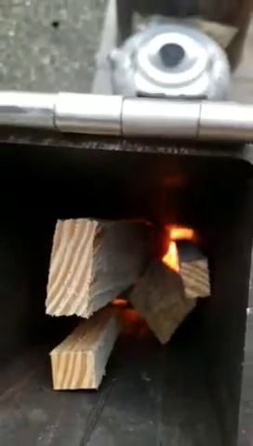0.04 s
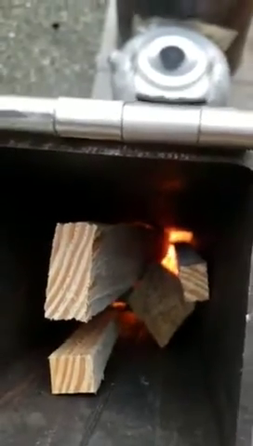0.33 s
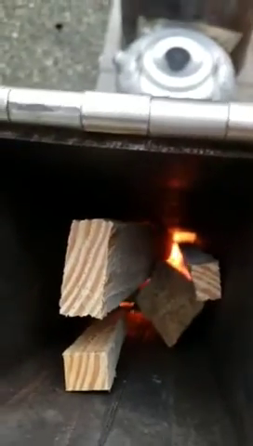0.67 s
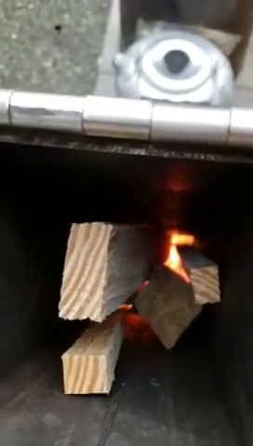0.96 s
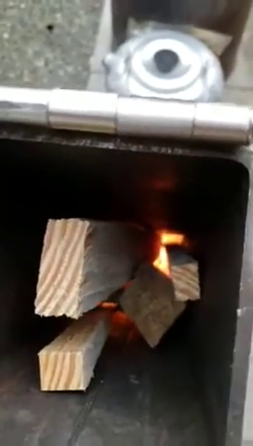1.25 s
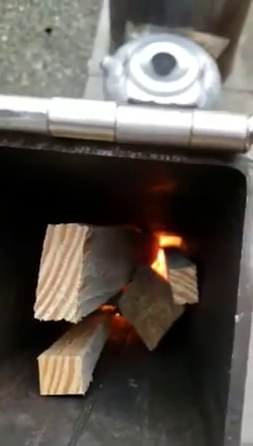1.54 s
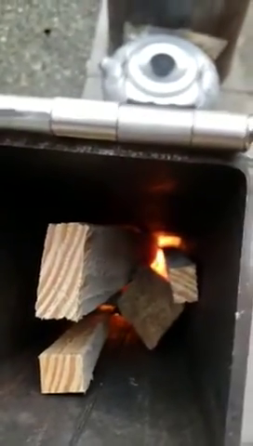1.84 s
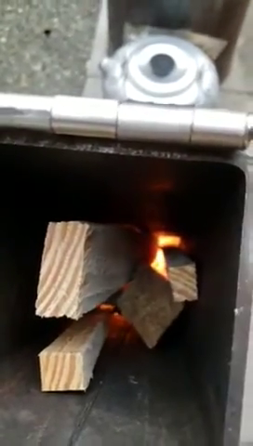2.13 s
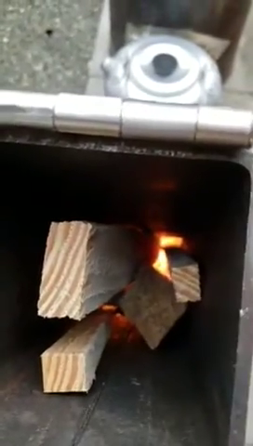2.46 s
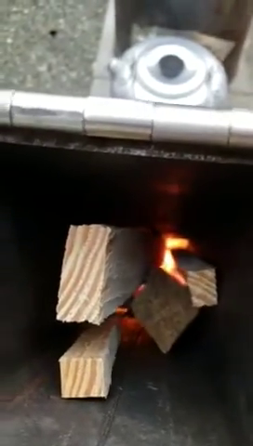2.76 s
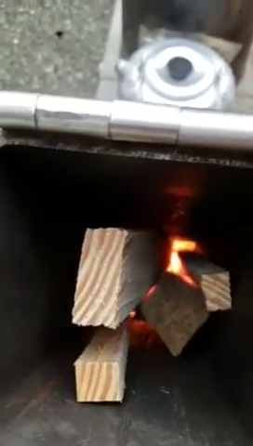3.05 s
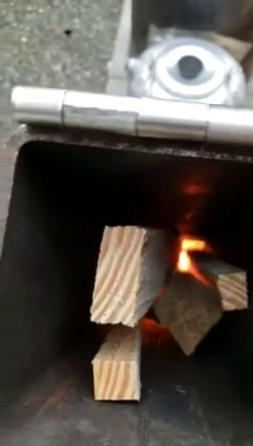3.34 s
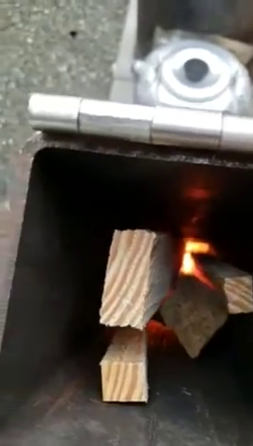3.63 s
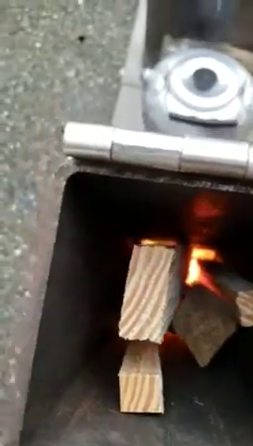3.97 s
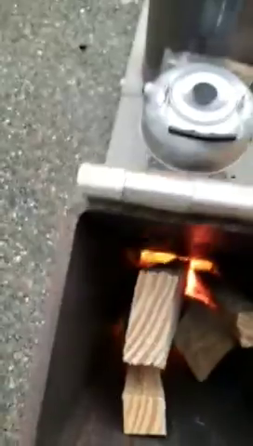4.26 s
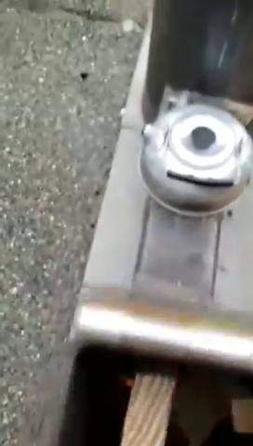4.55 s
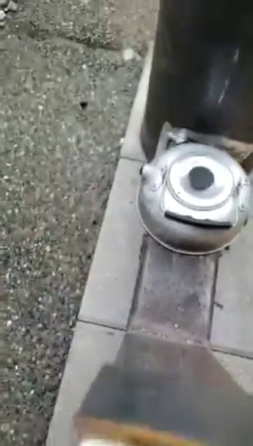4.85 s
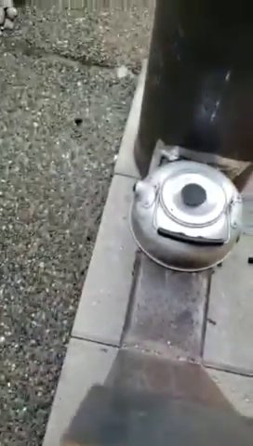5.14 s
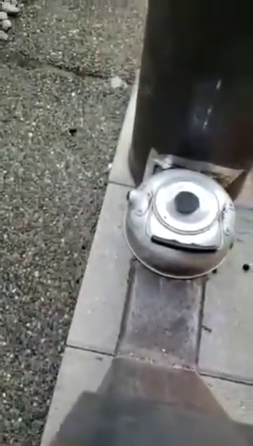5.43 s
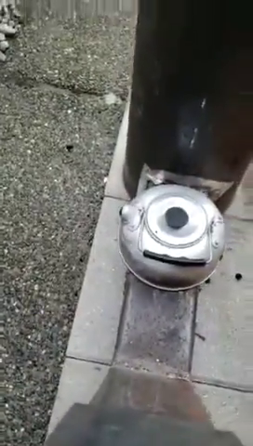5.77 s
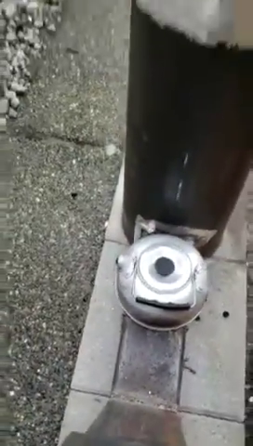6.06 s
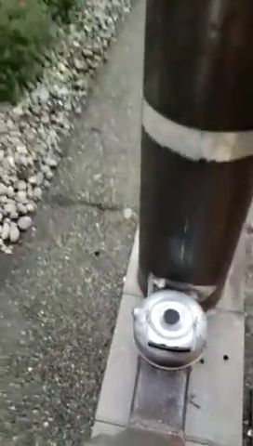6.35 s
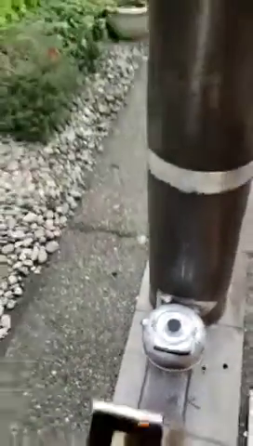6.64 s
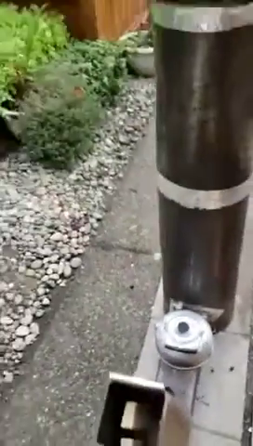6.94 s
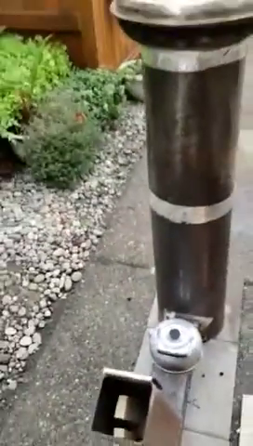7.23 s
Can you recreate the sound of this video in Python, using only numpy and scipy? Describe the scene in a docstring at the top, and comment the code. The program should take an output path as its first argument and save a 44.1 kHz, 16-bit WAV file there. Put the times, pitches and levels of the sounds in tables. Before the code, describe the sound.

Close over the opening of a steel wood stove, flames rumble and flutter with a deep, resonant pipe tone. Small crackles, soft puffs and a thin sizzle come from the wood throughout. A sharp snap comes about midway and a louder one later, as the sound shifts slightly right. The fire then grows quieter as the microphone draws back, with a faint, dull outdoor background underneath.

```python
"""Fire in a steel stove

A fire draws hard in a home-made stove outdoors. Fluttering flames drive the air modes of the feed
tube and flue pipe into a rumble; the sticks hiss, sizzle, spit gas and crack. The microphone pair
hangs over the feed opening, then passes beside the pipe and backs away."""
import sys
import numpy as np
from scipy import signal
from scipy.fft import rfft, irfft
from scipy.io import wavfile
from scipy.ndimage import uniform_filter1d, map_coordinates

SR = 44100
rng = np.random.default_rng(int(sys.argv[2]) if len(sys.argv) > 2 else 0)


def to_wav(sig):
    """Store sig (one row per channel, or 1-D mono) as 16-bit WAV at the path in sys.argv[1].

    Samples outside -1..1 are clipped; the rate is SR.
    """
    pcm = np.clip(np.atleast_2d(sig), -1, 1) * 32767
    pcm = np.round(pcm).astype(np.int16)
    wavfile.write(sys.argv[1], SR, pcm.T)  # frames by channels


N = 321914
TIME = np.arange(N) / SR
FREQ = np.fft.rfftfreq(N, 1 / SR)


def amp(db):
    """Decibels to gain."""
    return 10 ** (np.asarray(db) / 20)


def unit(x):
    """Scales to unit rms."""
    return x / np.sqrt(np.mean(x ** 2) + 1e-20)


def unit_onset(x, span_s=0.002):
    """Scales to unit rms over the onset."""
    return x / np.sqrt(np.mean(x[:, :round(span_s * SR)] ** 2))


def running_rms(x, span_s):
    """Sliding rms; dividing by it leaves only the faster flutter."""
    return np.sqrt(abs(uniform_filter1d(np.mean(x ** 2, axis=0), int(span_s * SR))) + 1e-20)


def curve(points):
    """Breakpoints interpolated over time."""
    return np.interp(TIME, *np.transpose(points))


def spectrum(points):
    """Breakpoints interpolated over log frequency."""
    hz, value = np.transpose(points)
    return np.interp(np.log(FREQ + 1), np.log(hz + 1), value)


def colour(x, gain):
    """Filters by one gain per frequency."""
    return irfft(rfft(x) * gain, N)


def highpass(hz, order):
    """Gain per frequency of a high-pass."""
    return 1 / (1 + (hz / (FREQ + 1)) ** order)


def resonances(modes):
    """Gain per frequency of steep-skirted modes, summed in power."""
    gains = (amp(db) / (1 + ((FREQ - hz) / (0.59 * width_hz)) ** 2) for hz, width_hz, db in modes)
    return np.sqrt(sum(gain ** 2 for gain in gains))


def wander(hz):
    """Smooth unit-rms noise up to a given rate."""
    return unit(colour(rng.standard_normal(N), 1 / (1 + (FREQ / hz) ** 4)))


def stereo_noise(correlation):
    """White noise; left-right correlation overall or per frequency."""
    a, b = rng.standard_normal((2, N))
    mid = colour(a, np.sqrt((1 + correlation) / 2))
    side = colour(b, np.sqrt((1 - correlation) / 2))
    return np.array([mid + side, mid - side])


def short_noise(correlation, size):
    """A short stretch of stereo white noise."""
    noise = rng.standard_normal((3, size))
    return np.sqrt(correlation) * noise[0] + np.sqrt(1 - correlation) * noise[1:]


def impulses(per_s, spread_db):
    """Random impulses of uneven strength."""
    return (rng.random(N) < per_s / SR) * amp(spread_db * np.minimum(rng.exponential(1, N), 2))


def pan(db):
    """Constant-power gains for a left-minus-right level."""
    gains = amp(np.array([np.atleast_1d(db), -np.atleast_1d(db)]) / 2)
    return gains / np.sqrt(np.mean(gains ** 2, axis=0))


def add(mix, start_s, sound):
    """Mixes a sound in at a time."""
    part = mix[:, round(start_s * SR):][:, :sound.shape[1]]
    part += sound[:, :part.shape[1]]


# freq_hz, density_db
GARDEN_SPECTRUM = [(20, -23), (70, -32), (170, 0.5), (270, 1.5), (550, 0.5), (680, -3), (780, -11),
                   (950, -4.5), (1200, -25.5), (1900, -20.5), (2600, -55), (5000, -29)]

def garden(level_db=-57):
    """Steady, dull outdoor background."""
    return amp(level_db) * unit(colour(stereo_noise(0.5), amp(spectrum(GARDEN_SPECTRUM))))


# Stove position: time_s, aside (0 straight below, 1 off to the right)
STOVE_ASIDE = [(0, 0.0015), (4.0, 0), (4.7, 1), (5.4, 1), (6.2, 0.56), (7.3, 0.68)]

def side_shade(x, shade_db=-4):
    """With the stove off to the right, the left channel is weaker."""
    return x * pan(shade_db * curve(STOVE_ASIDE))


def side_delay(x):
    """With the stove off to the right, sound reaches the left microphone later."""
    lag_s = np.interp(TIME, [0, 3.9, 4.7, 7.3], [-.00003, 0, .00027, .00032])
    return np.array([map_coordinates(x[0], [(TIME - lag_s) * SR], order=5), x[1]])


# freq_hz, pan_db
BEAM_PAN = [(100, -8), (1500, -4), (4000, 4.5), (8000, 3), (12000, 11), (15000, 18)]

def opening_beam(x):
    """Treble beams unevenly from the opening, favouring the left microphone above it."""
    aside = curve(STOVE_ASIDE)
    return (1 - aside) * colour(x, pan(spectrum(BEAM_PAN))) + aside * x


# pitch_hz, width_hz, gain_db
TUBE_MODES = [(3460, 71, -20), (3830, 36, -3), (4240, 77, -2), (4600, 44, -4), (4990, 74, -3.5),
              (6440, 400, -7.5), (7900, 980, -6), (12070, 500, -7.5), (15000, 500, -5)]

def feed_tube(x):
    """Sound from the sticks rings the steel tube on its way out; a bright peak also sits near 15 kHz."""
    return x + sum(amp(db) * signal.lfilter(*signal.iirpeak(hz, hz / width_hz, fs=SR), x)
                   for hz, width_hz, db in TUBE_MODES)


# pitch_hz, width_hz, gain_db
WALL_MODES = [(50.4, 11, -20), (86, 4.5, 2), (106.5, 100, -2)]
# Loss as the microphone backs away: time_s, gain_db
DISTANCE_GAIN = [(0, 0.5), (4.4, -1), (5.55, -4), (5.95, -4.5), (6.1, -9.5), (6.45, -6.5), (6.7, -16.5),
                 (7.3, -20.5)]

def wall_rumble(level_db=-49, distance_share=0.14):
    """The draught shakes the pipe wall at its deepest modes, which fade little with distance."""
    wall = unit(colour(stereo_noise(0.98), resonances(WALL_MODES) * highpass(28, order=4)))
    return amp(level_db + distance_share * curve(DISTANCE_GAIN)) * wall


# start_s, level_db, pitch_hz, pan_db
EMBER_TICKS = [(.3495, -57, 6700, -4), (.5955, -57, 11800, 5), (.7665, -58, 14000, 3),
               (.7875, -55, 14000, 7), (.9995, -58, 12600, 3), (1.0435, -55, 14500, 4),
               (1.3435, -57, 11600, 5), (2.0105, -59, 6100, -4), (2.2075, -60, 8000, -1),
               (2.4015, -62, 7500, 3), (2.4225, -58, 14000, 4), (2.4425, -58, 12200, 5),
               (3.0992, -54, 7460, 5), (3.2125, -62, 14500, 3), (3.2923, -54, 4900, -5),
               (4.2265, -55, 13400, 9), (4.8115, -51, 8400, -10), (5.0365, -57, 7600, -6),
               (5.0485, -55, 7700, -5), (5.2075, -56, 4400, -13), (5.2295, -56, 7500, -9),
               (5.7025, -57, 12800, -11), (6.7045, -58, 14000, -5)]

def embers(gain_db=2, t60_s=0.0093, width_octaves=0.42, size=1024):
    """Flakes of char flick off the embers: dry ticks, each around its own pitch."""
    out, t, hz = np.zeros((2, N)), np.arange(size) / SR, np.fft.rfftfreq(size, 1 / SR)
    for start_s, level_db, pitch_hz, pan_db in EMBER_TICKS:
        band = 1 / (1 + (np.log2((hz + 1) / pitch_hz) / width_octaves) ** 2)
        tick = irfft(rfft(short_noise(0.18, size)) * band, size) * amp(-60 * t / t60_s)
        add(out, start_s, amp(level_db + gain_db) * pan(pan_db) * unit_onset(tick))
    return out


# time_s, level_db
HISS_LEVEL = [(0, -59), (1.5, -60.5), (1.75, -61.5), (2.4, -59.5), (3.8, -61.5), (4.25, -59.5), (4.65, -56),
              (6.1, -57.5), (6.55, -60.5), (6.81, -64), (7.3, -67.5)]
# Over the opening and beside the pipe: freq_hz, density_db
HISS_SPECTRUM_OVER = [(1500, 3), (1950, 3), (2400, 2.5), (3100, 2), (4200, 1), (5400, -1.5), (6400, -1.5),
                      (8000, -4.5), (9400, -3.5), (12000, -3.5), (14000, -1), (15300, -2)]
HISS_SPECTRUM_BESIDE = [(1500, 7), (1950, 4), (2300, 1.5), (2720, -5), (3500, 1), (4150, -1), (4800, -2.5),
                        (7900, -5.5), (9200, -7), (12500, -6.5), (14000, -8.5), (15300, -4)]
# Splitting wood, for ticks and cracks: low_hz, high_hz, decay_factor, echo_db
SPLIT_BANDS = [(1893, 2290, 0.66, -25), (3450, 4600, 0.84, 9.5), (4900, 7900, 0.93, 11.5),
               (10340, 20000, 0.57, 0.5)]

def hiss(gain_db=2.5, flicker_db=1.45, flicker_hz=35, tick_db=-8, tick_decay_s=0.0058):
    """Gas seeps from the wood in a flickering hiss, with tiny ticks of splitting char."""
    gas = stereo_noise(0.05) * amp(flicker_db * wander(flicker_hz))
    for low_hz, high_hz, *_ in SPLIT_BANDS[1:]:  # coarse, medium and fine char
        splits = impulses(per_s=70, spread_db=4)
        envelope = signal.lfilter([1], [1, -np.exp(-1 / (tick_decay_s * SR))], splits)
        ticks = unit(stereo_noise(0.05) * envelope)
        gas += amp(tick_db) * colour(ticks, (FREQ > low_hz) & (FREQ < high_hz))
    over = unit(colour(gas, amp(spectrum(HISS_SPECTRUM_OVER))))
    beside = unit(colour(gas, amp(spectrum(HISS_SPECTRUM_BESIDE))))
    aside = curve(STOVE_ASIDE)
    pan_db = -4 - 3 * aside
    return ((1 - aside) * over + aside * beside) * amp(curve(HISS_LEVEL) + gain_db) * pan(pan_db)


# time_s, gain_db
TREBLE_GAIN = [(0, -1.5), (.6, -1), (5.3, 1.5), (5.95, 3.5), (6.25, 4.5), (6.6, 1.5), (7.3, 0)]

def treble_swell(x, from_hz=11000):
    """The top treble slowly rises, then falls back."""
    return x + (amp(curve(TREBLE_GAIN)) - 1) * colour(x, highpass(from_hz, order=12))


def sizzle(per_s=60, gain_db=-12, t60_s=0.012, pitches=16, pan_spread_db=4):
    """Sap droplets burst on hot wood in tiny pitched ticks; the level follows the hiss."""
    out, t = np.zeros((2, N)), np.arange(512) / SR
    for hz in np.linspace(3200, 9000, pitches):
        bursts = impulses(per_s / pitches, spread_db=3)
        phase_cycles = 0.67 * rng.random((2, 1))
        tick = amp(-60 * t / t60_s) * np.sin(2 * np.pi * (hz * t + phase_cycles))
        ticks = signal.oaconvolve(bursts[None], tick, axes=1)[:, :N]
        out += pan(pan_spread_db * rng.standard_normal()) * ticks
    return amp(gain_db + curve(HISS_LEVEL)) * unit(out)


# peak_s, level_db, half_length_s, tilt_db_per_octave, pan_db
HISSING_SWELLS = [(0.313, -54, 0.01, 6, -4), (.78, -64, 0.013, 5, -2), (1.374, -56, 0.026, -0.5, -5),
                  (1.49, -55, 0.0079, 1, -8), (2.716, -59, 0.012, -3, -3), (3.10, -58, 0.0073, 1, -8),
                  (3.58, -49, 0.0082, 11, -5), (4.145, -62, 0.013, 1, 0), (6.047, -61, 0.0051, -6, -10),
                  (6.49, -51, 0.024, 0, -4.5)]
# freq_hz, density_db
SWELL_SPECTRUM = [(1200, -9), (2300, 13), (3100, 12.5), (4200, 8.5), (7500, 8.5), (10000, 6), (12500, 5),
                  (15000, -5)]

def hissing_swells(flicker_db=1, flicker_hz=300, tilt_from_hz=2000):
    """Short hissing swells: spits of gas and the ragged tail of a loud crack."""
    out = np.zeros((2, N))
    noise = stereo_noise(0.13) * amp(flicker_db * wander(flicker_hz))
    octaves = np.log2(np.maximum(FREQ, tilt_from_hz) / tilt_from_hz)
    for peak_s, level_db, half_s, tilt, pan_db in HISSING_SWELLS:
        swell = np.exp(-np.abs((TIME - peak_s) / half_s) ** 1.37 / 2)
        rush = unit(colour(noise, amp(spectrum(SWELL_SPECTRUM) + tilt * octaves)))
        out += amp(level_db) * swell * pan(pan_db) * rush
    return out


# pitch_ratio, gain_db, t60_s
STICK_MODES = [(1, 2, 0.17), (1.58, -3, 0.057), (2.01, -7, 0.019)]
# start_s, knock_db, knock_hz, low_db, middle_db, high_db, pan_db, ring_hz, ring_gain_db, echo_gain_db
WOOD_CRACKS = [(0.0656, -78, 1290, -59, -57, -44, 3, 4600, -1, -24),
               (0.129, -75, 1290, -59, -59, -40, 8, 6900, 7, -17),
               (0.2955, -70, 1270, -54, -54, -37.5, -9, 5100, -6, -9),
               (0.677, -72, 1290, -51, -48, -40, -4, 6400, 3, -18),
               (1.4, -63, 1290, -50, -43.5, -37, -7, 2770, 3, -25),
               (1.4945, -62, 1330, -44, -41, -58, -7, 3900, -5, -23),
               (1.6, -75, 1290, -59, -57, -46, -4, 4350, -3, -11),
               (1.887, -80, 1290, -74, -63, -49, 12, 7200, 12, -9),
               (2.7092, -53, 1650, -60, -51.5, -56, -4, 4270, 13, -14),
               (2.9198, -73, 1290, -66, -49, -41, 0, 7100, 8, -24),
               (3.253, -75, 1290, -63, -59, -47, 10, 6800, -3, -13),
               (3.581, -72, 1280, -58, -47, -43, -7, 7900, 5, -17),
               (3.874, -56, 1260, -50.5, -27, -22, -10, 5000, -0.5, -37),
               (4.128, -72, 1300, -56, -48.5, -42, -3, 6600, -5, -21),
               (4.827, -75, 1290, -67, -50, -38, -12, 9100, 10, -25),
               (5.299, -65, 1280, -44.5, -42, -48, -15, 4640, 9, -27),
               (5.5387, -65, 1290, -46, -45, -48, -17, 5350, 13.5, -28),
               (6.0262, -43.5, 1286, -26.5, -30, -23.5, -9.5, 4050, 4, -23.5),
               (6.3596, -80, 1290, -70, -57, -41, -8, 7800, -3, -21),
               (6.48, -57, 1310, -53, -44, -52, -15, 4520, 4, -30),
               (6.486, -62, 1320, -59, -57, -40, -8, 8700, -3, -20),
               (6.491, -68, 1280, -54, -61, -52, -5, 4340, 2, -20),
               (6.646, -72, 1290, -52, -55, -45, -11, 8160, 12, -20),
               (6.974, -80, 1290, -62, -58, -44, -12, 6180, 0, -17)]

def cracks(gain_db=-4.5, fracture_s=0.00029, rise_s=0.00012,
           snap_t60_s=0.019, echo_t60_s=0.14, ring_t60_s=0.015, size=4096):
    """Wood fibres snap: a sharp burst, a woody knock, a ringing splinter, a short firebox echo."""
    out, t = np.zeros((2, N)), np.arange(size) / SR
    attack = 1 - np.exp(-t / rise_s)
    fracture = amp(5) * np.exp(-t / fracture_s)
    for (start_s, knock_db, knock_hz, low_db, middle_db, high_db,
         pan_db, ring_hz, ring_gain_db, echo_gain_db) in WOOD_CRACKS:
        knock = sum(amp(knock_db + db - 60 * t / t60_s) * np.sin(2 * np.pi * ratio * knock_hz * t)
                    for ratio, db, t60_s in STICK_MODES)
        phase = 2 * np.pi * ring_hz * t
        splinter = np.sin(phase) + amp(-7.5) * np.sin(0.885 * phase)  # bends two ways
        crack = knock + amp(middle_db + ring_gain_db - 60 * t / ring_t60_s) * splinter
        band_levels_db = knock_db - 6, low_db, middle_db, high_db
        for (low_hz, high_hz, decay_factor, echo_db), db in zip(SPLIT_BANDS, band_levels_db):
            band = signal.butter(4, [low_hz, high_hz], "band", fs=SR, output="sos")
            snap = amp(-60 * t / (snap_t60_s * decay_factor))
            echo = amp(echo_gain_db + echo_db - 60 * t / echo_t60_s) * (1 - snap)
            burst = signal.sosfilt(band, short_noise(0.14, size) * attack * (fracture + snap + echo))
            crack = crack + amp(db) * unit_onset(burst)
        add(out, start_s, amp(gain_db) * pan(pan_db) * crack)
    return out


# peak_s, level_db, half_length_s
FLAME_PUFFS = [(0.128, -50.5, 0.012), (0.22, -56, .01), (0.497, -54, .006), (0.846, -53, 0.0073),
               (1.012, -56, 0.011), (1.113, -53, 0.0099), (1.23, -67, .008), (2.128, -53, 0.0042),
               (2.343, -56, 0.0077), (2.845, -55, 0.02), (3.096, -49, 0.0071), (3.348, -47.5, 0.0076),
               (3.388, -49, 0.0081), (3.465, -50.5, 0.0073), (3.909, -50.5, 0.0055), (4.017, -60, 0.006),
               (4.348, -52, 0.011)]
# freq_hz, density_db
PUFF_SPECTRUM = [(450, -28), (700, -10), (870, -13), (1000, -2), (1140, 0.5), (1320, 10), (1550, -3),
                 (2000, -24), (3000, -40)]

def sputters(pan_db=-1):
    """Tongues of flame tear off near the opening in short puffs."""
    puffs = sum(amp(db) * np.exp(-((TIME - peak_s) / half_s) ** 2) for peak_s, db, half_s in FLAME_PUFFS)
    return puffs * pan(pan_db) * unit(colour(stereo_noise(0.97), amp(spectrum(PUFF_SPECTRUM))))


# pitch_hz, width_hz
FLUE_MODES = [(117.5, 5.9), (166.5, 6)]
# Draught in each mode: time_s, level_db
LOWER_MODE_LEVEL = [(0.0, -49), (0.12, -60), (0.24, -39), (0.37, -38), (0.47, -60), (0.86, -42.5),
                    (1.02, -56), (1.41, -38.5), (1.68, -58), (1.78, -49), (2.33, -39), (2.41, -51.0),
                    (2.67, -50.5), (2.88, -45.5), (3.99, -59), (4.08, -45), (4.4, -47), (4.64, -50),
                    (4.79, -47), (5.01, -54.5), (5.47, -48.5), (5.6, -54.5), (6.53, -47.5), (6.64, -68),
                    (6.82, -49.5), (7.29, -72)]
UPPER_MODE_LEVEL = [(0.0, -35.5), (0.19, -37), (0.3, -35.5), (0.37, -54), (0.56, -32), (0.62, -42.5),
                    (0.91, -44), (0.99, -39.5), (1.17, -35.5), (1.34, -39.5), (1.38, -45.5), (1.61, -32.5),
                    (1.67, -48), (1.82, -40.5), (1.88, -47), (1.95, -42.5), (2.02, -54), (2.07, -37),
                    (2.17, -34.5), (2.32, -47), (2.39, -36.5), (2.52, -31), (2.57, -41), (2.78, -35.0),
                    (2.93, -46), (3.08, -35), (3.32, -38.0), (3.62, -39.0), (3.72, -36.5), (3.95, -35.5),
                    (4.13, -43.5), (4.27, -32.5), (4.33, -41), (4.51, -36), (4.56, -43.5), (4.89, -35.5),
                    (5.27, -47.5), (5.38, -36.0), (5.79, -42.5), (5.84, -37), (6.36, -47.5), (6.4, -42.5),
                    (6.73, -50.5), (7.12, -41), (7.18, -57), (7.29, -52)]
# freq_hz, left_right_correlation
TURBULENCE_CORRELATION = [(30, 0.91), (150, 0.99), (400, 1), (700, 0.92), (1300, 0.65), (2500, 0.094)]

def flue(lower_gain_db=-1, upper_gain_db=0.2, swell_db=0.1, swell_hz=12):
    """Turbulence keeps two low pipe modes ringing; each swells and sags with the draught."""
    rings = [colour(stereo_noise(spectrum(TURBULENCE_CORRELATION)), resonances([(hz, width_hz, 0)]))
             for hz, width_hz in FLUE_MODES]
    levels_db = curve(LOWER_MODE_LEVEL) + lower_gain_db, curve(UPPER_MODE_LEVEL) + upper_gain_db
    return sum(amp(db + swell_db * wander(swell_hz)) * ring / running_rms(ring, span_s=0.13)
               for ring, db in zip(rings, levels_db))


def gas_drift(x, depth=0.008, rate_hz=9):
    """Hot and cool gas pass in turn, so the pitch of the air modes drifts."""
    position = np.arange(N) + np.cumsum(depth * wander(rate_hz))
    return np.array([map_coordinates(side, [position], order=3, mode="mirror") for side in x])


# Air in feed tube, firebox and pipe: pitch_hz, width_hz, gain_db
STOVE_MODES = [(149.8, 18, -1), (191.6, 22.8, -4.5), (236.6, 7.6, -16), (303.4, 13, -7.5),
               (327.7, 17.4, -2), (364, 34, -2.5), (393.3, 23.2, -1.5), (441.7, 16.8, 1.5), (484, 24, -12),
               (525, 102, -16.5), (636, 66, -25.5), (690, 37, -20), (855.6, 34, -19), (905, 46, -32),
               (1126.7, 37, -19.5), (1277, 65, -20), (1310, 130, -27), (1400, 215, -27), (1957, 64, -34)]
# time_s, gain_db
FLAME_STRENGTH = [(0.0, -0.5), (0.18, -5.5), (0.26, 1), (0.34, -3.5), (0.55, 0.5), (0.77, -5.5),
                  (0.81, 3.5), (0.97, -3), (1.04, 0.0), (1.42, -2.5), (1.48, 0.5), (1.75, -4.5), (2.05, 1),
                  (2.14, -2.5), (2.54, 1.0), (2.59, -6), (2.64, 0.5), (2.69, -3), (2.88, 0.5), (3.13, -2),
                  (3.22, 1), (3.34, -0.5), (3.6, 1), (3.64, -1.5), (4.17, 0.5), (4.22, -2.5), (4.35, 1),
                  (4.57, -0.5), (4.84, 2.5), (4.91, 0), (5.22, 4), (5.3, 1), (5.43, 3.5), (5.53, 1),
                  (5.64, 4.5), (5.68, -2.5), (6.36, 0), (6.42, -3), (6.61, -1), (7.29, 0.5)]
# peak_s, gain_db, half_length_s
FLARE_UPS = [(1.113, 2, 0.0037), (1.345, 8.5, 0.0061), (1.496, -6, 0.0018), (2.09, 4.5, 0.016),
             (2.342, 5.5, 0.0093), (3.247, 1.5, 0.061), (3.588, 6, 0.013), (4.064, 7.5, 0.0084),
             (4.261, 7.5, 0.013), (4.686, 11.5, 0.0021), (5.839, 8, 0.018), (5.958, 9, 0.0069)]

def roar(flutter_db=1.7, flutter_hz=80, split_hz=780, surge_db=0.8, surge_hz=6):
    """Fluttering flames surge, flare up and sound through the air modes of the stove."""
    flare = amp(sum(db * np.exp(-((TIME - peak_s) / half_s) ** 2) for peak_s, db, half_s in FLARE_UPS))
    flame = stereo_noise(spectrum(TURBULENCE_CORRELATION)) * amp(flutter_db * wander(flutter_hz))
    stove = resonances(STOVE_MODES)
    upper = highpass(split_hz, order=12)  # short waves beam out of the opening
    body, beam = (gas_drift(colour(flame * flare, gain) / running_rms(colour(flame, gain), span_s=0.12))
                  for gain in (stove * (1 - upper), stove * upper))
    distance_db, flame_db = curve(DISTANCE_GAIN), curve(FLAME_STRENGTH)
    body_db = -38.5 + distance_db + flame_db
    beam_db = -56 + 0.55 * distance_db + 0.68 * flame_db + surge_db * wander(surge_hz)
    return amp(body_db) * body + amp(beam_db) * beam


def scene():
    """The stove in the garden, heard from the moving microphones."""
    wood = opening_beam(feed_tube(treble_swell(hiss()) + hissing_swells() + cracks()))
    fire = side_shade(flue() + roar() + sputters() + sizzle())
    return side_delay(fire + wall_rumble() + wood + embers()) + garden()


def record(dry, cutoff_hz=15750):
    """Steep low-pass band limit."""
    lowpass = signal.firwin(511, cutoff_hz, window=("kaiser", 9), fs=SR)
    return signal.oaconvolve(dry, lowpass[None], "same", axes=1)


dry = scene()
out = record(dry)
to_wav(out)
```